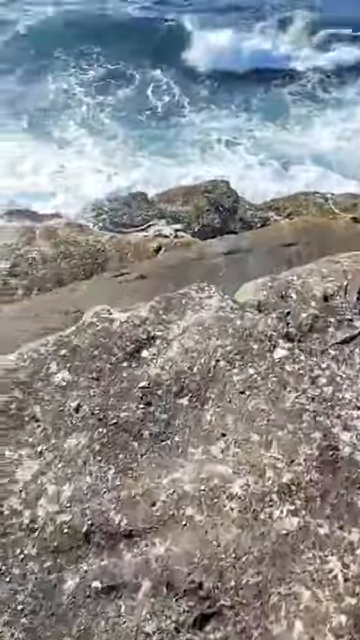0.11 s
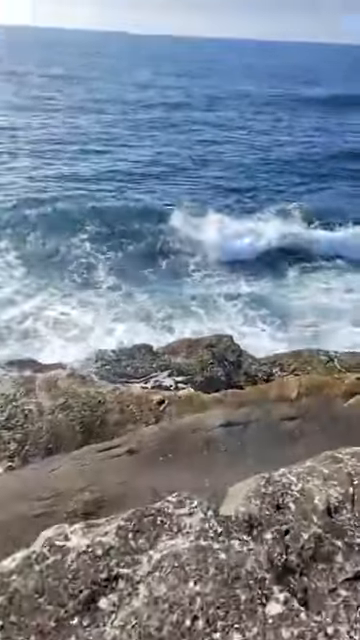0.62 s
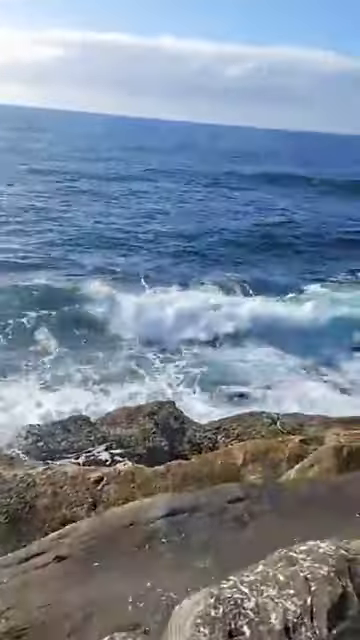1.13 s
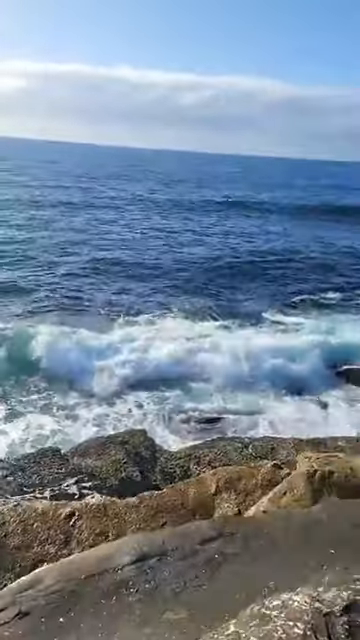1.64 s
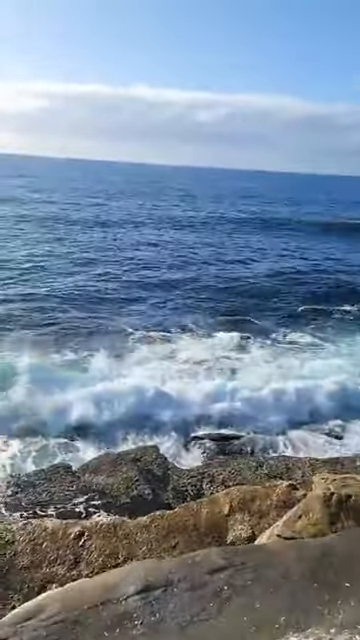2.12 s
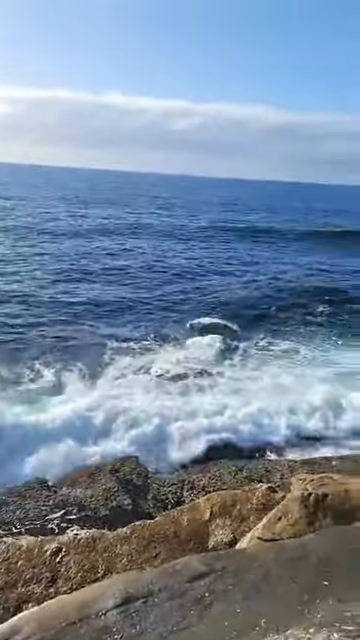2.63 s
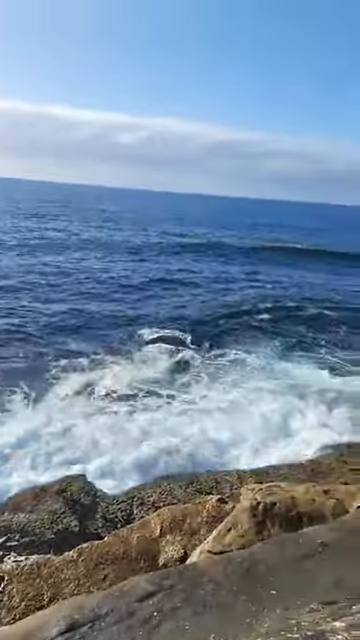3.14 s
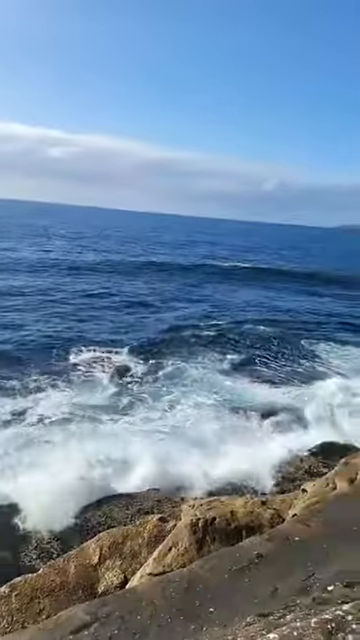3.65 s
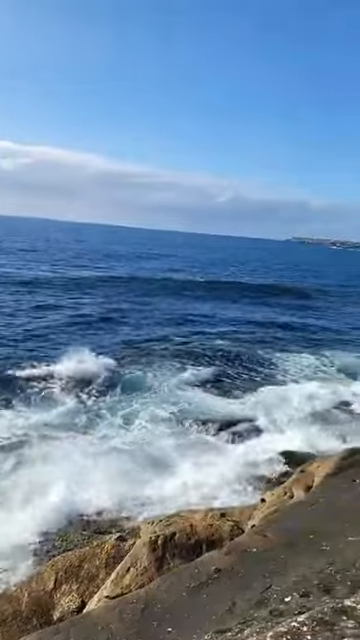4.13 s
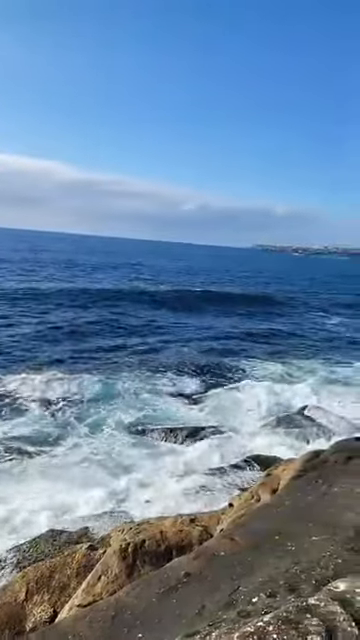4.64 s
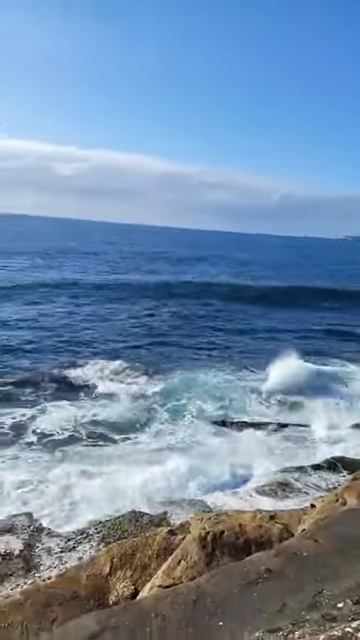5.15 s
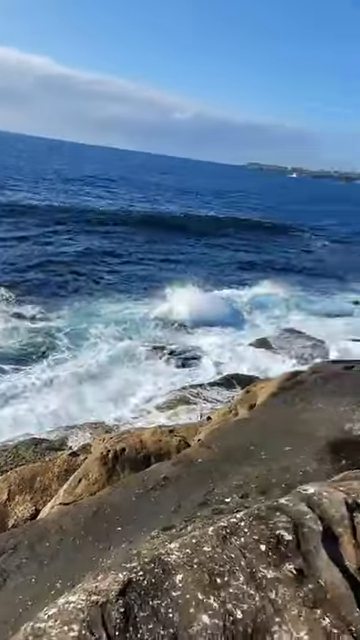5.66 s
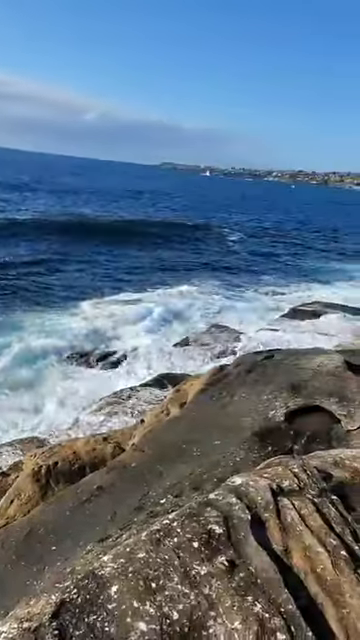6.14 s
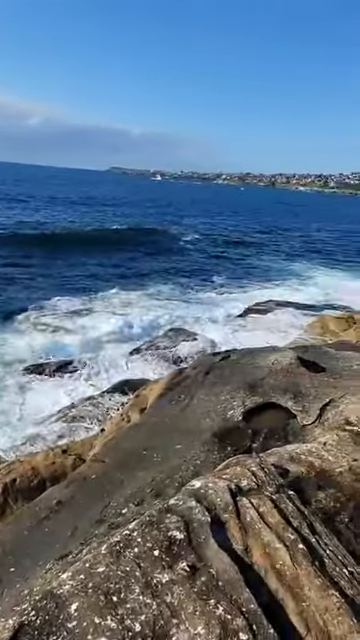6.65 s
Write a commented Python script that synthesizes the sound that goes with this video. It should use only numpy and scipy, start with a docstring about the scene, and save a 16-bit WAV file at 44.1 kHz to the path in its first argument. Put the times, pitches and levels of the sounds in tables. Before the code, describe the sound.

Waves break on a rocky shore, heard in mono from a handheld phone in the wind. From 0 s a deep, soft-edged roar of tumbling water runs under a grainy wash, with thin airy spray filling in over the first second. Low thumps and fluttering gusts knock the microphone from the start. The roar swells unevenly, strongest around 2.4 s, then stays full. Near 4 s the roar gives way to a brighter rush: fizzing foam full of tiny bubble clicks surges up, peaking about 4.5 s, with another swell near 5.2 s. Wind grows heavier from 3 s, the hardest thump at about 5 s. From 5.6 s the foam falls back sharply and the roar ebbs to a quieter wash, with strong low gusts around 6.2-6.5 s, easing by 6.8 s. The hiss slides in colour throughout, its treble slightly broken by narrow flickering gaps.

```python
"""Surf breaks and washes over a rock shelf below a hand-held phone with one microphone.
First a deep roar swells in filtered noise, gusts already thumping the port, and weak fine spray fills in.
Near 4 s rushing wash and fizzing foam, noise grained with tiny clicks, surge up; near 5 s a gust hits hardest.
From about 5.6 s the foam sinks back and the roar ebbs. All along, sliding bands shift the colour of the hiss
as the hand turns the phone along the shore, and narrow gaps open and shut in the treble."""
import sys
import numpy as np
from scipy import signal
from scipy.fft import rfft, irfft, next_fast_len
from scipy.io import wavfile
from scipy.ndimage import uniform_filter1d, map_coordinates

SR = 44100
rng = np.random.default_rng(int(sys.argv[2]) if len(sys.argv) > 2 else 0)


def bounce(signal):
    """Save signal as a 16-bit WAV file at the path given by the first command-line argument."""
    frames = np.transpose(np.atleast_2d(signal))
    limited = np.clip(frames, -1, 1)
    pcm = np.round(limited * 32767).astype(np.int16)
    wavfile.write(sys.argv[1], SR, pcm)


def nominal_scale(level):
    """Amplitude ratio for a level in decibels (scalar or array-like)."""
    x = np.asarray(level, float) / 20
    return 10 ** x


N = 298998
TIME_S = np.arange(N) / SR
HOP = 128  # samples between spectral frames
LIFT_HZ = 6750  # the top octave partly repeats the band this far below it
USUAL_ROAR_DB, USUAL_FOAM_DB = -26.5, -38  # reference levels of the wave


def surf():
    """Roar, rushing sheet, foam and spray; the last three share one grain and one seethe."""
    seethe = 0.33 * wobble(5.14) + 0.24 * wobble(12) + 0.54 * wobble(20)
    fizz = bursts(count=20000, spread_db=1)
    grain = patchy(patchy_db=0.07, streaky_db=2.5) + 0.25 * fizz
    return roar() + wash(grain, seethe) + foam(grain, seethe) + spray(grain, fizz, seethe)


# The wave's course as it breaks and runs out; columns: t/s, tumbling water level/dB, foam level/dB
WAVE_COURSE = [(0, -27, -41), (.4, -27.5, -41), (.5, -26.5, -40.5), (.65, -24.5, -39), (1.0, -26, -40.5),
               (1.28, -24, -37.5), (1.6, -25, -39), (2.4, -23, -36.5), (3.1, -24, -38), (3.8, -25, -38),
               (4.0, -24, -37), (4.12, -28, -34.5), (4.5, -25.5, -31.5), (5.05, -27, -34.5),
               (5.2, -27, -32), (5.5, -28, -32.5), (5.61, -31, -35.5), (5.68, -30, -40.2),
               (6.4, -31.5, -40), (6.78, -31, -41.5)]


def wave_levels(t):
    """Levels of tumbling water and foam in dB at times t; every surf layer follows them."""
    return curves(WAVE_COURSE, t)


# Spectrum of the tumbling water; columns: f/Hz, level/dB per Hz
ROAR_SPECTRUM = [(40, -33), (120, -8.5), (220, 0.5), (400, -2), (600, -8.5), (900, -13), (1500, -33),
                 (3000, -50)]


def roar():
    """The tumbling mass of the breaker: patchy low noise that brightens as the wave spreads into foam."""
    tilt_db_per_oct, tilt_per_foam = 0.47, 0.17

    def tilt(hz, t):
        roar_db, foam_db = wave_levels(t)
        foam_lead_db = (foam_db - USUAL_FOAM_DB) - (roar_db - USUAL_ROAR_DB)
        slope_db = tilt_db_per_oct + tilt_per_foam * foam_lead_db
        return nominal_scale(slope_db * np.log2(np.clip(hz, 150, 1200) / 350))

    roar_db, _ = wave_levels(TIME_S)
    tumble = coloured(patchy(patchy_db=0.82, streaky_db=1.04), ROAR_SPECTRUM)
    return nominal_scale(roar_db) * shaped(tumble, tilt)


# Spectrum of the rushing sheet; columns: f/Hz, level/dB per Hz
WASH_SPECTRUM = [(400, -7), (800, -0.5), (1100, 0.5), (1700, -0.5), (2400, -5.5), (3300, -13.5),
                 (6000, -48)]


def wash(grain, seethe):
    """The rushing sheet: mid-band grain that follows roar and foam and grows as it climbs the shelf."""
    base_db, nears_db_per_s = -36, 0.316
    per_roar, per_foam = 0.34, 0.47  # dB of wash per dB of each
    roar_db, foam_db = wave_levels(TIME_S)
    level_db = base_db + nears_db_per_s * TIME_S
    level_db += per_roar * (roar_db - USUAL_ROAR_DB) + per_foam * (foam_db - USUAL_FOAM_DB)
    return nominal_scale(level_db + 0.34 * seethe) * coloured(grain, WASH_SPECTRUM)


# Spectrum of the fizzing foam; columns: f/Hz, level/dB per Hz
FOAM_SPECTRUM = [(1500, -34), (2600, -1), (3500, 3), (5600, 4), (6400, 0.5), (7000, -6), (7350, -12),
                 (7480, -34)]


def foam(grain, seethe):
    """Fizzing foam: treble grain of noise and bubble clicks, swelling with the foam and its seethe."""
    _, foam_db = wave_levels(TIME_S)
    return nominal_scale(foam_db + 0.83 * seethe) * coloured(grain, FOAM_SPECTRUM)


# Spectrum of the fine spray; columns: f/Hz, level/dB per Hz
SPRAY_SPECTRUM = [(7350, -50), (7500, -18), (9000, -10), (11000, -5.5), (12500, 1.5), (13400, -5),
                  (13800, -9), (14150, -14), (14300, -1.5), (15000, -6), (15150, -11), (15700, -12),
                  (15800, -40)]


def spray(grain, fizz, seethe):
    """Fine spray: airy top-octave hiss that follows the foam, starting weaker and filling in over a second."""
    base_db, per_foam = -45, 1.12
    late_db, late_s = 4.5, 0.45  # shortfall at the start and its decay time
    _, foam_db = wave_levels(TIME_S)
    level_db = base_db - late_db * np.exp(-TIME_S / late_s) + per_foam * (foam_db - USUAL_FOAM_DB)
    airy = lifted(grain) + 0.46 * rng.standard_normal(N) + 0.44 * fizz
    flutter_db = 0.95 * seethe + 0.78 * wobble(60)
    return nominal_scale(level_db + flutter_db) * coloured(airy, SPRAY_SPECTRUM)


def bursts(count, spread_db):
    """Bursting foam bubbles: clicks of either sign at random moments, most alike and a few weaker."""
    when, size, sign = rng.random((count, 3)).T
    level_db = spread_db * np.log(1 - size)
    return unit(np.bincount((when * N).astype(int), np.sign(sign - 0.5) * nominal_scale(level_db), N))


# Spectrum of the thump of air on the port; columns: f/Hz, level/dB per Hz
THUMP_SPECTRUM = [(15, -45), (28, -27), (45, -1.5), (65, 4), (95, -3.5), (150, -11), (400, -43)]
# Spectrum of the higher flutter of faster air; columns: f/Hz, level/dB per Hz
FLUTTER_SPECTRUM = [(50, -26), (90, -7), (125, 1.5), (170, -6), (250, -12.5), (600, -37.5)]
# Uneven breeze on the port, under the single gusts; columns: t/s, level/dB
BREEZE = [(0, -34), (.5, -34), (.62, -26.5), (1.2, -26.5), (1.6, -33), (2.1, -33), (2.45, -28.5),
          (2.8, -31.5), (3.55, -30.5), (3.9, -23), (4.2, -25.5), (4.6, -24.5), (5.1, -23.5), (5.5, -30),
          (5.9, -27.5), (6.1, -30), (6.45, -25), (6.55, -33.5), (6.78, -39)]
# Single gusts; columns: peak t/s, thump level/dB, flutter level/dB over the thump
GUSTS = [(.07, -20.5, -4.5), (.23, -25, -11), (.36, -23.5, -1), (.6, -24, 2), (.77, -25, 1.2),
         (.9, -22.5, 1), (1.0, -20, -8), (1.24, -22, -1.5), (1.34, -25.5, -3), (1.51, -26, -12),
         (1.66, -26, -3), (2.21, -22, -4), (2.42, -25, -5), (2.83, -25, -9), (2.95, -24, -1),
         (3.06, -19, -9), (3.25, -19, -2), (3.36, -20.5, 1.5), (3.68, -21, -4), (3.81, -18, -1.5),
         (3.88, -22, 2.5), (3.95, -24, 6), (4.0, -22, 9.5), (4.08, -17, -7.5), (4.3, -19.5, 2),
         (4.36, -20, 1), (4.5, -22.5, 0), (4.7, -24, -8), (4.82, -19.5, -1.5), (4.9, -19.5, -2.5),
         (5.03, -14.5, -6), (5.12, -22.5, 3), (5.19, -21, 0), (5.34, -18.5, -6), (5.55, -21.5, -1),
         (5.95, -23.5, 7), (6.02, -25, -6), (6.21, -18.5, -5), (6.31, -17.5, -14), (6.38, -16.5, -4.5),
         (6.44, -18, -10), (6.67, -28, -4)]


def wind():
    """Eddies push on the port in lumps over an uneven breeze; faster air adds a higher flutter."""
    rise_db_per_s, fall_db_per_s = 280, 220
    lull_db, breeze_flutter_db = 1.8, 0.6  # how far the breeze wavers; its flutter over its thump
    t = np.arange(0, N + HOP, HOP) / SR
    peak_s, gust_db, flutter_db = np.transpose(GUSTS)[:, :, None]
    below_peak_db = np.maximum(rise_db_per_s * (peak_s - t), fall_db_per_s * (t - peak_s))
    gusts = nominal_scale(gust_db - below_peak_db)
    breeze = nominal_scale(curves(BREEZE, t)[0] + lull_db * np.interp(t, TIME_S, wobble(14)))
    # the strongest push at each moment wins
    low = np.maximum(breeze, gusts.max(axis=0))
    high = np.maximum(breeze * nominal_scale(breeze_flutter_db), (gusts * nominal_scale(flutter_db)).max(axis=0))
    low, high = (np.interp(TIME_S, t, level) for level in (low, high))
    thump = evened(coloured(rng.standard_normal(N), THUMP_SPECTRUM), share=0.43)
    flutter = evened(coloured(rng.standard_normal(N), FLUTTER_SPECTRUM), share=0.33)
    return nominal_scale(1.2 * wobble(30)) * (low * thump + high * flutter)


# Bands that reflections off hand and body lift or cancel while a hold lasts;
# columns: start t/s, end t/s, start f/Hz, end f/Hz, level/dB
HOLDS = [(0.53, 1.72, 2310, 2270, 5.5), (1.84, 4.302, 1980, 1630, 4), (4.5, 5.6, 1620, 1700, 2),
         (5.56, 7.9, 1300, 1200, 4.5), (.22, .55, 4600, 3550, -7.5), (.55, .93, 3500, 3330, -6.5),
         (1.0, 2.6, 3700, 3200, -2), (2.74, 4.1, 2440, 2400, -2.5), (4.19, 6.9, 2960, 2860, -4.5),
         (0, .95, 5400, 5600, 1.8), (1.6, 3.0, 2300, 2250, 1.6), (.95, 2.25, 5150, 4850, 5.5),
         (1.2, 2.3, 4420, 4130, 3.5), (1.2, 2.3, 5550, 5350, 2), (2.2, 3.3, 4650, 4500, 4.5),
         (0, 1.06, 4100, 4100, 3), (2.3, 2.9, 5100, 5400, 3), (3.44, 3.9, 3400, 3600, 1.5),
         (4.702, 5.5, 3500, 3480, 3), (5.2, 5.6, 3460, 3520, 2.5), (5.56, 5.72, 2950, 2950, -4),
         (5.5, 5.78, 2100, 2050, -5.5), (3.3, 4.2, 4800, 4830, 1.5), (4.49, 5.6, 5400, 6340, 2),
         (5.5, 6.047, 2070, 2160, 3.5), (5.8, 6.9, 2100, 2040, 2.5), (5.8, 6.9, 5640, 5600, 2.8),
         (6.0, 6.9, 3500, 3500, -2.5), (4.2, 5.7, 4400, 4200, -1.5)]


def grip(x):
    """Short reflections lift or cancel bands; each fades in, slides as the phone turns, and fades out."""
    fade_share = 0.25  # fade time over the length of the hold
    width_hz, width_per_hz = 170, 0.014  # the bands widen with frequency

    def colour(hz, t):
        level_db = np.zeros((len(hz), len(t)))
        for start, end, from_hz, to_hz, band_db in HOLDS:
            edge_s = np.minimum(t - start, end - t)
            held = np.clip(edge_s / (fade_share * (end - start)) + 0.5, 0, 1)
            on = held > 0
            centre_hz = np.interp(t[on], [start, end], [from_hz, to_hz])
            offset = (hz - centre_hz) / (width_hz + width_per_hz * centre_hz)
            level_db[:, on] += band_db * held[on] * np.exp(-0.5 * offset ** 2)
        return nominal_scale(level_db)

    return shaped(x, colour)


# Three states of the treble gap, which reaches from the edge up to the first row's edge;
# columns: share of the time [0-1], edge f/Hz
GAP_EDGES = [(.4, 7450), (.5, 7100), (.1, 6600)]


def treble_gaps(x):
    """Gaps open and shut at the edge of the core band and, less deep, LIFT_HZ higher; nothing passes the top."""
    top_hz = 15760
    share, edges_hz = np.transpose(GAP_EDGES)

    def gate(hz, t):
        drift = uniform_filter1d(uniform_filter1d(rng.standard_normal(len(t)), size=20), size=10)
        state = np.searchsorted(np.quantile(drift, np.cumsum(share)[:-1]), drift)

        def gap(f):
            return (f > edges_hz[state]) & (f < edges_hz[0])

        copy_gain = 1 - 0.9 * gap(hz - LIFT_HZ)
        return ~gap(hz) * copy_gain * (hz < top_hz)

    return shaped(x, gate, size=8)


def patchy(patchy_db, streaky_db):
    """White noise varying in broad patches and in narrow, short streaks (rms depths in dB)."""
    def field(hz, t):
        broad, narrow = rng.standard_normal((2, len(hz), len(t)))
        broad = uniform_filter1d(uniform_filter1d(broad, size=10, axis=0), size=30, axis=1)
        narrow = uniform_filter1d(narrow, size=20, axis=1)
        return nominal_scale(patchy_db * unit(broad) + streaky_db * unit(narrow))

    return shaped(rng.standard_normal(N), field, size=8)


def lifted(x):
    """x with every frequency raised by LIFT_HZ, by turning its analytic signal."""
    analytic = signal.hilbert(x, next_fast_len(N))[:N]
    return np.real(analytic * np.exp(2j * np.pi * LIFT_HZ * TIME_S))


def evened(x, share):
    """Narrow noise with a share of its own beating taken out, so that it swings more like a tone."""
    swing = np.abs(signal.hilbert(x, next_fast_len(N))[:N])
    return unit(x / (swing + 0.23) ** share)


def unit(x):
    """Scale to rms 1."""
    return x / np.sqrt(np.mean(np.abs(x) ** 2) + 1e-20)


def along(points, hz):
    """Gain of (f/Hz, level/dB) points on a log axis, practically silent outside them."""
    f, db = np.transpose(points)
    return nominal_scale(np.interp(np.log(hz + 1), np.log(f + 1), db, -120, -120))


def curves(rows, t):
    """Each column after the time, read at times t."""
    s, *cols = np.transpose(rows)
    return [np.interp(t, s, c) for c in cols]


def wobble(rate):
    """A smooth random curve, rate knots a second."""
    knots = rng.standard_normal(int(N * rate / SR) + 4)
    return map_coordinates(knots, [np.arange(N) * rate / SR])


def coloured(x, spectrum):
    """x through a spectrum, at rms 1."""
    m = next_fast_len(N + 8192)  # padded against wrap-around
    gain = along(spectrum, np.fft.rfftfreq(m, 1 / SR))
    return unit(irfft(rfft(x, m) * gain, m)[:N])


def shaped(x, gain, size=4):
    """x times a gain of frequency and time; size sets the window in hops."""
    frame = dict(nperseg=size * HOP, noverlap=(size - 1) * HOP)
    hz, t, z = signal.stft(x, SR, **frame)
    return signal.istft(z * gain(hz[:, None], t), SR, **frame)[1][:N]


def scene():
    """Surf coloured by the grip, wind straight on the port; the same in both channels."""
    mono = grip(surf()) + wind()
    return np.array([mono, mono])


def band_limit(x):
    """A steep low-pass at the top of the band."""
    return signal.sosfilt(signal.butter(12, 15900, fs=SR, output="sos"), x)


def record(dry):
    """One microphone: its signal, with gaps in the treble, goes alike to both channels."""
    mono = treble_gaps(dry[0])
    return band_limit(np.array([mono, mono]))


dry = scene()
out = record(dry)
bounce(out)
```